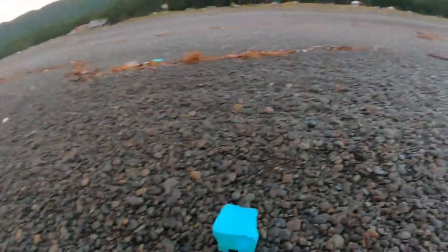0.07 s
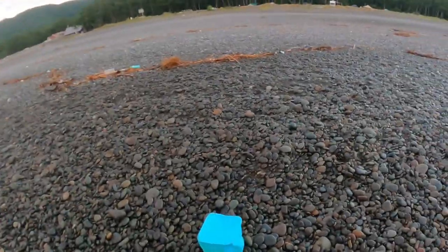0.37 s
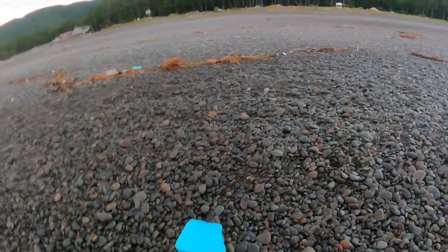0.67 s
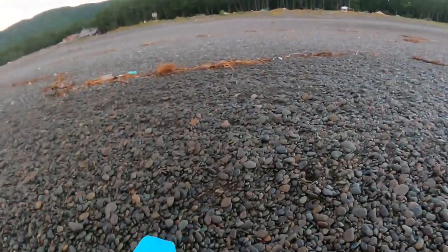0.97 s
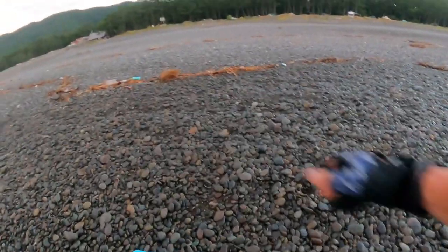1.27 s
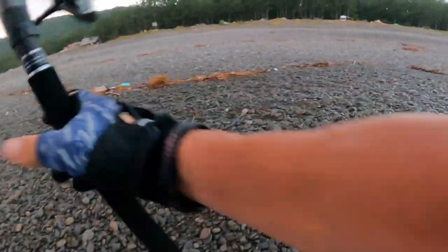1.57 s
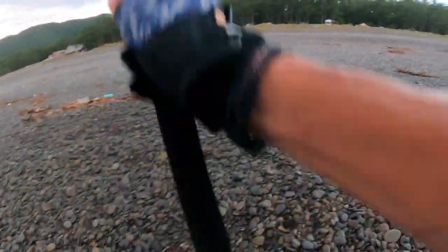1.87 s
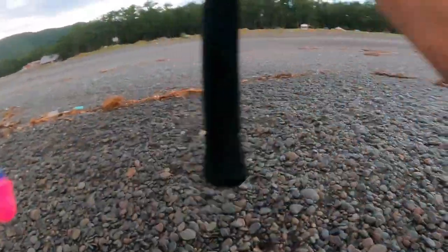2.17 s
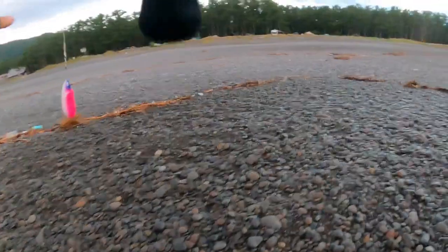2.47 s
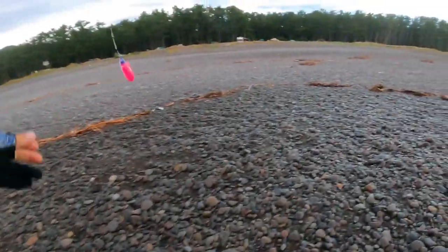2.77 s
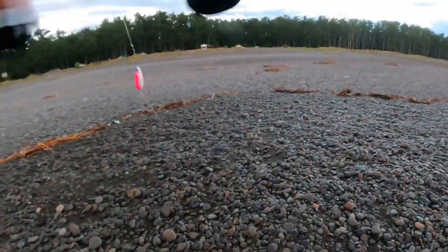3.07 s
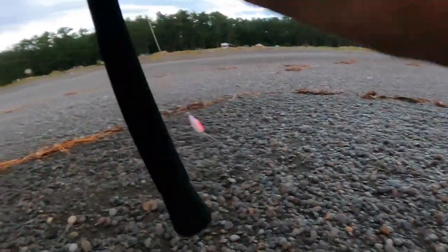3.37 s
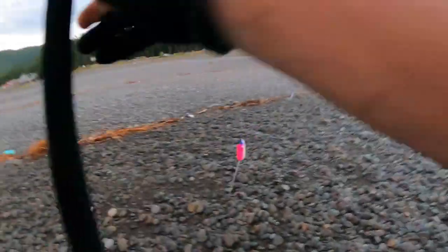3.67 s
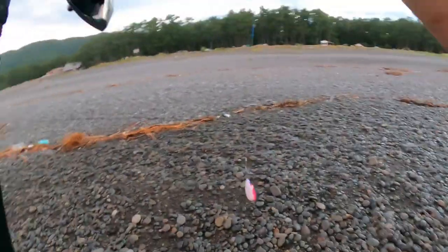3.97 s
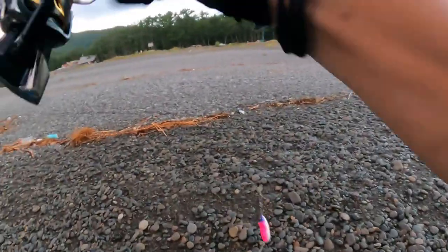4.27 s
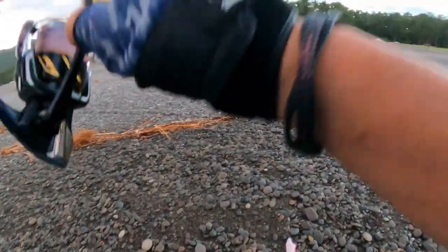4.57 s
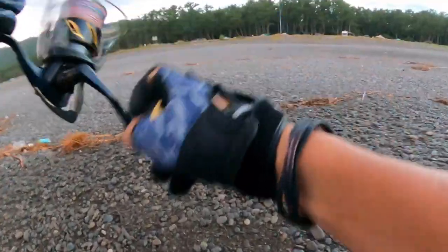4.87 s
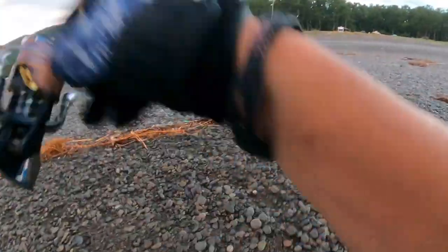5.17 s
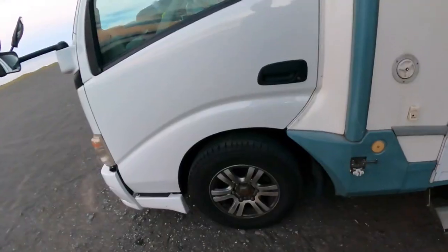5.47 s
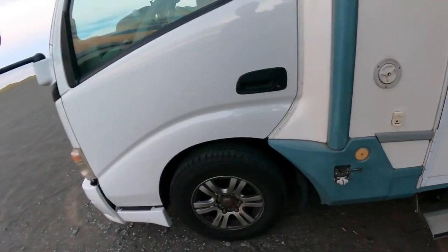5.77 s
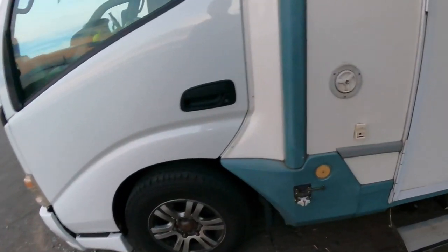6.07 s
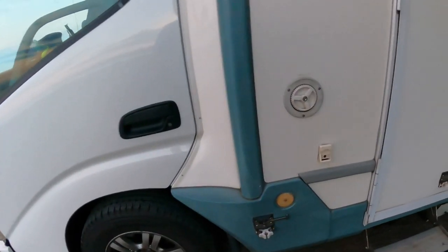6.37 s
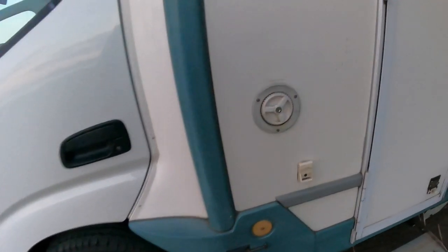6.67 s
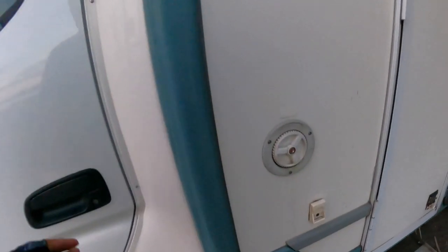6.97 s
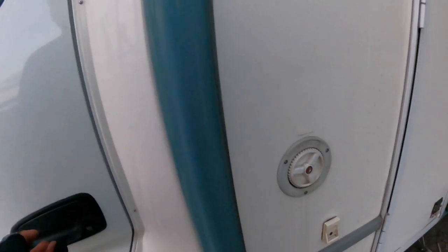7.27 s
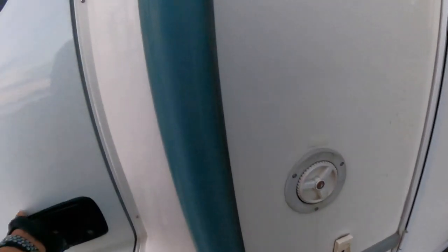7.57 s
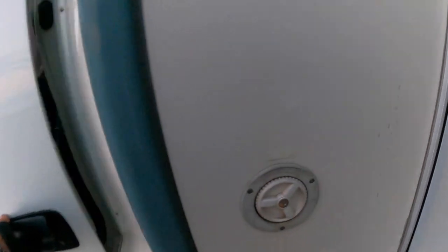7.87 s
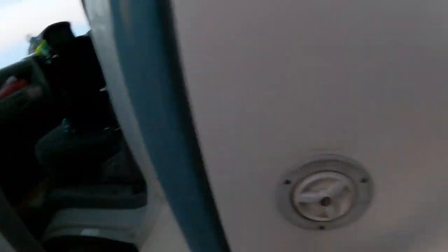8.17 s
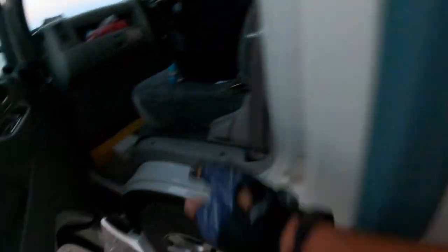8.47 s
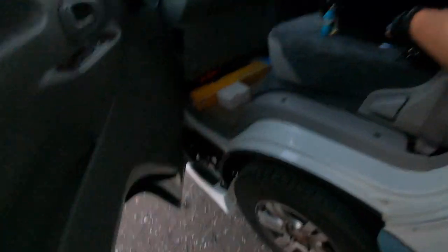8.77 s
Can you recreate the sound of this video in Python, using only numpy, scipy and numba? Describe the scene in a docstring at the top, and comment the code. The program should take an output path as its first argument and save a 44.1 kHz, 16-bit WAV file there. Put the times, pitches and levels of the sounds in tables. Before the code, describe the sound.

From the start, close footsteps crunch unevenly over beach pebbles, the stones clacking, clinking and grinding. A soft wash of surf fades after about 1 second, while low wind rumbles on the body-worn microphones throughout. Stronger steps land near 0.8, 2.3, 3.1 and 4.3 seconds; soles skid around 3.7, 4.4 and 5.1, the last with a grating stone. At about 5.4 seconds the sound cuts abruptly to a quieter gravel lot with light shoe scuffs and ticks. A faint, high insect buzz swells near 7 seconds and stops by 7.5. A distant bird gives short, faint chirps from 7 to 8.7. At 7.4 a hand scrapes and clicks into a van's door handle, and at 7.8 the latch releases with a hollow, briefly ringing thump, slightly left. Small clicks and scuffs follow, with a softer door knock near 8.9 seconds.

```python
"""Pebble beach and van door

Someone walks up a pebble beach: stones clack by impact and grind by friction under each step, while surf
fades behind and wind rumbles on body-worn microphones. Abruptly, a quieter gravel lot follows: an insect
sings, a far bird chirps, shoes scuff, a hand scrapes into a van's door handle, and the latch lets go,
setting the hollow door ringing with a thump."""
import sys
import numpy as np
from scipy import signal
from scipy.fft import rfft, irfft, next_fast_len
from scipy.io import wavfile
from scipy.ndimage import uniform_filter1d
from numba import njit

SR = 44100
rng = np.random.default_rng(int(sys.argv[2]) if len(sys.argv) > 2 else 0)


def put_to_file(sound):
    """Save the sound as 16-bit audio at rate SR, in the file named by the first command-line argument."""
    columns = np.atleast_2d(sound).T  # one column per channel
    safe = np.clip(columns, -1, 1)
    whole_steps = np.round(safe * 32767)
    wavfile.write(sys.argv[1], SR, whole_steps.astype(np.int16))


N = 394254
TIME = np.arange(N) / SR
CUT_S = 5.36  # the beach gives way to the gravel lot


def undb(db):
    """Amplitude ratio of a level in decibels."""
    return 10 ** (np.asarray(db) / 20)


def unit(x):
    """Normalisation to an rms of 1."""
    return x / np.sqrt(np.mean(x ** 2) + 1e-18)


def colour(x, points):
    """Minimum-phase filter through (Hz, dB) points: folding the cepstrum makes it causal."""
    size = next_fast_len(N + 8192, real=True)
    size += size % 2
    hz, db = np.transpose(points)
    freqs = np.arange(size // 2 + 1) * SR / size
    cepstrum = irfft(np.log(undb(np.interp(np.log(freqs + 1), np.log(hz), db))))
    cepstrum[1:size // 2] *= 2
    cepstrum[size // 2 + 1:] = 0
    return irfft(rfft(x, size) * np.exp(rfft(cepstrum)))[..., :N]


def rolloff(x, hz, kind):
    """Third-order low-pass or high-pass, 18 dB an octave."""
    return signal.sosfilt(signal.butter(3, hz, kind, fs=SR, output="sos"), x)


def resonate(x, hz, width_hz):
    """Forced response of one damped resonator."""
    return signal.lfilter(*signal.iirpeak(hz, hz / width_hz, fs=SR), x)


def wander(rate_hz):
    """Random modulation of rms 1, interpolated between knots."""
    knots = rng.standard_normal(2048)
    return unit(np.interp(TIME * rate_hz, np.arange(len(knots)), knots))


def noise(spectrum):
    """Spectrally shaped noise, independent in mid and side."""
    return unit(colour(rng.standard_normal((2, N)), spectrum))


def curve(points):
    """Gain over time, interpolated between (s, dB) points."""
    return undb(np.interp(TIME, *np.transpose(points)))


def envelope(start, attack, hold, fade):
    """Linear rise, hold, then exponential decay of 20 dB per fade time; a negative fade sustains."""
    age = TIME - start
    return np.clip(age / attack, 0, 1) * np.exp(-np.log(10) * np.clip((age - attack - hold) / fade, 0, 10))


def hiss():
    """Self-noise of the microphones: thin, steady and broadband."""
    # Each row: frequency in Hz, gain in dB.
    spectrum = [(500, 8.5), (2000, 1), (4000, -5), (6000, -5), (7600, 4.5), (8500, -4.5), (9600, -15),
                (11000, -29), (13000, -38), (15500, -59)]
    return noise(spectrum) * undb(-54)


def surf():
    """Broadband wash of waves, fading as the walker turns away and fainter at the van."""
    # Each row: frequency in Hz, gain in dB.
    spectrum = [(80, -5), (200, 4), (400, 3.5), (700, -0.5), (1100, -5.5), (1700, -12), (3000, -22),
                (6000, -28), (10000, -44), (13500, -51), (15500, -64)]
    # Each row: time in seconds, relative level in dB.
    levels = [(0, -37.5), (1.1, -37), (2.7, -43), (4, -47.5), (4.2, -44.5), (4.6, -47), (5.35, -44),
              (5.38, -48.5), (5.85, -51.5), (6.25, -49), (7.8, -55), (8.94, -54)]
    return noise(spectrum) * curve(levels) * undb(4 + wander(13))


def wind():
    """Turbulent pressure on the microphones: deep gusts and higher buffeting flutter together."""
    # Each row: frequency in Hz, gain in dB.
    gust_spectrum = [(12, -17), (25, -5), (40, 1.5), (55, -1.5), (70, 3), (95, -3.5), (140, -17),
                     (400, -84), (3000, -120)]
    buffet_spectrum = [(50, -13), (90, -0.5), (125, 2), (170, -2.5), (240, -10.5), (400, -22.5),
                       (1000, -62.5), (6000, -110)]
    # Each row: time in seconds, relative level in dB.
    gust_levels = [(0, -41), (2, -38), (4.3, -39), (5.3, -33.5), (6.5, -34.5), (8, -41), (8.94, -38)]
    buffet_levels = [(0, -32.5), (1, -35.5), (1.7, -41.5), (3.3, -43.5), (4.02, -41.5), (4.3, -33),
                     (5.3, -32.5), (5.7, -37), (7.7, -36.5), (8.1, -39.5), (8.94, -39)]
    flutter = undb(.91 * wander(12))
    gusts = noise(gust_spectrum) * curve(gust_levels) * undb(2)
    buffeting = noise(buffet_spectrum) * curve(buffet_levels) * undb(3)
    return (gusts + buffeting) * flutter


def insect(note_hz=5626, roughness_hz=110, rasp_hz=7200, rasp_width_hz=3000):
    """Modulation by slow noise widens an insect's note into a rough band; a thin rasp lies above it."""
    # The song swells, then stops. Each row: time in seconds, relative level in dB.
    levels = [(5.36, -68), (6.7, -63), (6.95, -59.5), (7.35, -61), (7.5, -80)]
    roughness = unit(rolloff(rng.standard_normal((2, N)), roughness_hz, "low"))
    note = roughness * np.sqrt(2) * np.sin(2 * np.pi * note_hz * TIME)
    rasp = rng.standard_normal((2, N))
    for _ in range(2):
        rasp = rolloff(resonate(rasp, rasp_hz, rasp_width_hz), 8500, "low")
    return (note + unit(rasp) * undb(-1)) * curve(levels) * (TIME > CUT_S)


def bird():
    """A far bird's chirps: short glides of a tone, modulated in frequency and amplitude, in mid only."""
    # Each row: start and length in seconds, first and last pitch in Hz, level in dB.
    chirps = [(7.056, .065, 4500, 4200, -53), (7.233, .06, 5500, 4700, -59), (7.45, .095, 5300, 4700, -58),
              (8.0, .06, 4950, 4500, -59), (8.07, .043, 4400, 4100, -56), (8.31, 0.1, 4550, 4150, -60),
              (8.68, .06, 4300, 4850, -58)]
    waver, flicker = 1 + .022 * wander(260), undb(4 * wander(110))
    song = np.zeros((2, N))
    for start, length, first_hz, last_hz, db in chirps:
        progress = np.clip((TIME - start) / length, 0, 1)
        hz = (first_hz + (last_hz - first_hz) * progress) * waver
        song[0] += undb(db) * flicker * np.sin(np.pi * progress) * np.sin(2 * np.pi * np.cumsum(hz) / SR)
    return song


@njit
def ring(starts, hz, t60, mid, side):
    """Free vibration: each contact sets off damped modes, summed in mid and side."""
    out = np.zeros((2, N))
    for k in range(len(starts)):
        first = int(starts[k] * SR)
        for m in range(hz.shape[1]):
            pole = np.exp(2j * np.pi * hz[k, m] / SR - np.log(1000) / (t60[k, m] * SR))
            phasor = 1 + 0j
            for i in range(first, min(N, first + int(t60[k, m] * SR))):
                out[0, i] += mid[k, m] * phasor.real
                out[1, i] += side[k, m] * phasor.imag
                phasor *= pole
    return out


def contacts(starts, sizes, ring_s, modes=6):
    """Modal impacts: each row of touches excites one set of random modes; low ones tend to ring longer."""
    shape = (len(starts), modes)
    hz = 14000 * ((np.arange(modes) + rng.random(shape)) / modes) ** 2 + 150
    t60 = ring_s * np.exp(.8 * rng.standard_normal(shape).clip(-2, 2)) * (4000 / hz) ** .35
    weight = hz ** .25 / np.sqrt(t60)
    mid, side = weight * rng.choice([-1, 1], shape), weight * rng.standard_normal(shape)
    return sum(ring(touch.copy(), hz, t60, mid * size[:, None], side * size[:, None])
               for touch, size in zip(starts.T, sizes.T))


def pressure(pushes, rest_db, lag_s, fade_ratio):
    """Incoherent pushes add in power, giving a bright load and a dull one that rises more slowly."""
    bright = dull = undb(rest_db) ** 2
    for start, attack, hold, fade, bright_db, dull_db in pushes:
        bright = bright + (undb(bright_db) * envelope(start, attack, hold, fade)) ** 2
        dull = dull + (undb(dull_db) * envelope(start, attack + lag_s, hold, fade * fade_ratio)) ** 2
    return np.sqrt(bright), np.sqrt(dull)


def crunch(loads, span_s, spectrum, ring_s, spread_db, clump_db, bright_db, dull_db, count, split_hz=2620):
    """Granular noise: many small contacts and a few large; the greater the load, the more stones knock."""
    bright, dull = loads
    begin, end = span_s
    when, strength, looseness, rebound = rng.random((count, 4)).T
    starts = begin + (end - begin) * when
    moving = np.interp(starts, TIME, np.clip((bright + dull) / undb(-22), .1, 1) ** .7)
    # a packed bed grinds more evenly; loose stones knock hard, the rest only rub
    packed = np.interp(starts, TIME, np.clip(dull / undb(-30), 0, 1))
    knock_db = -spread_db * (1 - .4 * packed) * np.log(np.maximum(strength, .012))
    sizes = np.where(looseness < moving, undb(knock_db), .45)
    # each stone rebounds once, at half strength
    touches = np.transpose([starts, starts + .004 * rebound])
    grains = colour(contacts(touches, np.outer(sizes, [1, .5]), ring_s), spectrum)
    grains *= undb(clump_db * wander(110))  # little avalanches
    out = 0
    for kind, load in (("high", bright * undb(bright_db)), ("low", dull * undb(dull_db))):
        band = rolloff(grains, split_hz, kind)
        # stones that move at one time share the energy of the push
        power = uniform_filter1d(band[0] ** 2, SR // 25) + np.mean(band[0] ** 2) / 1000
        out = out + band * load / np.sqrt(power)
    return out * (TIME < end)


def knocks(rows, spectrum, ring_s, chatter_s, fall_db, split_hz, bright_db, dull_db, clink_db, clink_s):
    """Rebound: a hard knock chatters six times within milliseconds, ever weaker; one pitch rings on."""
    starts, bright, dull, hz = np.transpose(sorted(rows))
    touch = np.arange(6)
    delays = chatter_s * (touch + rng.random((len(starts), len(touch))) - .5).clip(0)
    sizes = np.tile(undb(-fall_db * touch), (len(starts), 1))
    clicks = colour(contacts(starts[:, None] + delays, sizes, ring_s, modes=12), spectrum)
    clink_gain = undb(np.maximum(bright, dull) + clink_db)[:, None]
    clink_t60 = clink_s * np.sqrt(3000 / hz[:, None])
    clinks = ring(starts.copy(), hz[:, None].copy(), clink_t60, clink_gain, clink_gain / 2)
    out = rolloff(clinks, 8100, "low")
    # each knock is scaled to its own strength, band by band
    latest_knock = (np.searchsorted(starts, TIME + 1 / SR) - 1).clip(0)
    for kind, level_db in (("high", bright + bright_db), ("low", dull + dull_db)):
        band = rolloff(clicks, split_hz, kind)
        strength = np.sqrt(np.bincount(latest_knock, band[0] ** 2, len(starts)) / (SR / 200) + 1e-12)
        out = out + band * (undb(level_db) / strength)[latest_knock]
    return out


def scuffs():
    """Friction and small impacts by the van: shoes rasp on grit, a glove on the door, fittings tick."""
    # Each row: frequency in Hz, gain in dB.
    spectrum = [(120, 1), (350, 6), (700, 1.5), (1200, 3.5), (1800, -2), (2800, -7), (4000, -7.5),
                (5500, -12.5), (7000, -14), (8500, -26.5), (11000, -40.5), (15500, -53)]
    # Each row: start, attack, hold and fade in seconds, bright and dull relative levels in dB.
    rubs = [(5.99, .025, .035, .07, -44.5, -49), (6.12, .04, .2, .4, -54, -50),
            (6.73, 0.036, 0.062, 0.2, -50, -45), (6.9, 0.021, 0.041, .4, -52, -45.5),
            (7.37, .012, .025, 0.04, -23, -28), (7.41, 0.012, .012, .038, -30, -23),
            (7.612, .005, .075, 0.4, -49, -44), (7.69, .06, .015, .05, -36, -32),
            (7.794, 0.0053, .012, .055, -32, -23.5), (8.232, .006, .015, .06, -49, -44),
            (8.27, .02, .03, .08, -54, -54), (8.57, 0.009, .03, .1, -47.5, -46),
            (8.63, 0.029, .005, .025, -44, -36), (8.72, .03, 0.14, 1, -58, -48),
            (8.888, .014, .01, .06, -35, -44), (8.926, .008, .01, .05, -39, -48)]
    # Each row: start in seconds, bright and dull relative levels in dB, ringing pitch in Hz.
    ticks = [(5.536, -54, -27.5, 1060), (5.592, -46, -36.5, 1760), (5.659, -35, -50, 3600),
             (5.793, -33, -39, 1670), (6.318, -36, -44, 1200), (6.377, -33.5, -40, 1580),
             (6.509, -45, -35.5, 1430), (6.83, -48, -33, 1310), (6.935, -47, -35, 1400),
             (6.96, -46, -33, 980), (7.387, -26, -27, 3620), (7.425, -21.5, -24, 1150),
             (7.548, -42, -32, 1630), (7.617, -38.5, -33.5, 1270), (7.674, -42, -25, 1240),
             (7.754, -30, -39, 2470), (7.799, -39, -18.5, 1220), (7.835, -21, -18.5, 1000),
             (8.196, -35.5, -50, 3750), (8.235, -34.5, -47, 1680), (8.638, -47, -33, 1070),
             (8.659, -37, -24.5, 1910), (8.9, -40, -27, 1147)]
    loads = pressure(rubs, rest_db=-63, lag_s=.0028, fade_ratio=.94)
    rasping = crunch(loads, (CUT_S, N / SR), spectrum, ring_s=.0051, spread_db=3, clump_db=.5,
                     bright_db=-2, dull_db=1, count=10000)
    return rasping + knocks(ticks, spectrum, ring_s=.007, chatter_s=.0016, fall_db=2.5, split_hz=2200,
                            bright_db=-2.5, dull_db=-6, clink_db=-1, clink_s=.024)


def door(rattle_db=-12, rattle_t60=.2, side_db=3):
    """Impulse response of a hollow door to latch and handle: a long contact excites only low modes."""
    # Each row: frequency in Hz, relative level in dB, time to decay 60 dB in seconds.
    modes = [(46.3, -7.5, 0.15), (89, -19, .14), (166, -6.5, 0.14), (189, -4, 0.15), (247, -7.5, 0.087),
             (299, -13, 0.16), (328, -8.5, 0.19), (411, -10, 0.14), (461, -2.5, 0.066), (515, -9.5, 0.099),
             (587, -19, 0.18), (666, -12.5, 0.089), (785, -24, .15), (960, -25, .25), (1030, -18, .11),
             (1200, -28, .11), (1464, -25, .1)]
    # Each row: start in seconds, relative level in dB, contact time in milliseconds.
    blows = [(7.39, -21.5, 0.72), (7.424, -18, 0.69), (7.796, -7.5, 4.3), (7.808, -6, 2.8),
             (7.838, -9.5, 1.07), (8.660, -36, 0.54), (8.902, -20, 3)]
    age = TIME[:SR // 2]
    panel = sum(undb(db) * np.sin(2 * np.pi * hz * age) * undb(-60 * age / t60) for hz, db, t60 in modes)
    # trim and linkage inside add a dense, short rattle
    rattle = unit(rolloff(rng.standard_normal((2, len(age))), 860, "low"))
    rattle *= undb(rattle_db - 60 * age / rattle_t60)
    force = np.zeros(N)
    for start, db, contact_ms in blows:
        pulse = np.sin(np.pi * np.clip((TIME - start) * 1000 / contact_ms, 0, 1))
        force += undb(db) * pulse / pulse.sum()
    response = rattle + panel * np.array([[1], [undb(side_db)]])
    return signal.fftconvolve(response, force[None], axes=1)[:, :N]


def grating_stone():
    """Frictional excitation: jerky rubbing under the heel keeps the modes of one flat stone ringing."""
    # Each row: frequency and bandwidth in Hz, gain in dB.
    modes = [(1720, 90, -2), (2616, 60, 0), (2982, 50, 0), (3266, 70, -1), (3800, 250, -2)]
    rub = rng.standard_normal((2, N)) * undb(3 * wander(180))
    stone = sum(undb(db) * resonate(rub, hz, width) for hz, width, db in modes)
    return unit(stone) * undb(-32) * envelope(5.012, attack=.025, hold=.065, fade=.16) * (TIME < CUT_S)


def skidding_sole(slip_hz=85, slip_s=.0042, steady_drag=.28):
    """Stick-slip friction: each slip of the sole drags stones that sound in the hollows of the bed."""
    # Each row: resonance and bandwidth in Hz, gain in dB.
    hollows = [(740, 260, -2.5), (1040, 130, 1.5), (1360, 200, -3), (1690, 190, -3.5)]
    # Each row: start, attack, hold and fade in seconds, level in dB, frequency scale of the hollows.
    skids = [(3.63, .08, .04, 0.34, -33.5, 1.05), (4.378, .04, .03, 0.14, -30.5, 0.82),
             (5.058, .06, 0.1, 0.3, -27.5, 0.904)]
    phase = np.cumsum(slip_hz * np.exp(.34 * wander(60))) / SR % 1
    drag = rng.standard_normal((2, N)) * (steady_drag + np.exp(-phase / slip_hz / slip_s))
    out = 0
    for start, attack, hold, fade, db, scale in skids:
        bed = sum((-1) ** k * undb(gain_db) * resonate(drag, hz * scale, width * scale)
                  for k, (hz, width, gain_db) in enumerate(hollows))
        bed = unit(rolloff(bed, 2500 * scale, "low"))
        out = out + bed * undb(db) * envelope(start, attack, hold, fade)
    return out * (TIME < CUT_S)


def pebble_steps():
    """Granular flow underfoot: top stones clink brightly, the bed grinds dully, single stones clack."""
    # Each row: frequency in Hz, gain in dB.
    spectrum = [(150, -9), (400, 1), (800, 3), (1250, 4.5), (1800, 2.5), (2600, -0.5), (3400, -0.5),
                (5000, 1.5), (7000, -2.5), (8200, -11.5), (10000, -20), (13000, -32.5), (15500, -38)]
    # Each row: start, attack, hold and fade in seconds, bright and dull relative levels in dB.
    pushes = [(0, .002, 0.023, .09, -35, -35), (.08, .02, .22, .15, -52, -42),
              (.343, .004, .008, .03, -36, -35), (.445, .04, .015, .04, -39, -43),
              (.562, .004, .015, 0.03, -41, -42), (.61, .015, .005, .03, -44, -45),
              (.795, .09, .025, .13, -23.5, -27.5), (.935, .025, .055, .25, -28.5, -31),
              (1.06, 0.031, .05, .13, -36, -36), (1.19, .01, .035, .03, -27, -26.5),
              (1.25, .02, .01, .12, -43, -46), (1.582, .018, .015, .085, -24.5, -29),
              (1.697, .01, .03, .12, -37.5, -39.5), (1.87, 0.043, 0.055, .05, -44, -42.5),
              (2.06, .02, .06, .05, -45, -46), (2.15, .015, .02, 0.087, -37, -36),
              (2.23, .01, .02, .04, -42, -47), (2.285, .005, .01, .12, -38, -39),
              (2.33, .012, 0.057, 0.17, -31.5, -32.5), (2.445, 0.016, 0.036, 0.17, -33, -38.5),
              (2.6, .05, 0.0084, .07, -38, -40), (2.85, .09, .005, 0.03, -39, -38),
              (2.985, 0.019, .012, .05, -34, -28.5), (3.094, .025, .03, 0.15, -22, -23.5),
              (3.15, .015, .01, 0.18, -24, -33), (3.325, .025, .04, .07, -38, -37),
              (3.46, .03, .12, 0.4, -46.5, -44), (3.63, 0.038, 0.036, 0.13, -35.5, -33),
              (3.7, 0.027, 0.0084, 0.13, -27.5, -26.5), (3.82, 0.044, .1, .15, -43.5, -40),
              (4.02, .02, .055, .04, -46, -43), (4.18, .02, .04, .04, -49, -47),
              (4.258, 0.01, 0.066, 0.23, -25, -34), (4.37, .05, 0.071, .1, -28.5, -29.5),
              (4.51, .025, .012, .055, -26, -24), (4.75, .08, .05, 0.5, -50.5, -48),
              (4.94, .02, 0.046, -0.5, -47, -40.5), (4.998, 0.015, 0.079, .2, -25.5, -26),
              (5.1, .04, .085, .07, -32, -30), (5.29, 0.018, .05, .05, -43, -39)]
    # Each row: start in seconds, bright and dull relative levels in dB, ringing pitch in Hz.
    clacks = [(.014, -21.5, -20, 1290), (.062, -30, -27.5, 1450), (.347, -27.5, -42, 1750),
              (.452, -30, -46, 5200), (.492, -22, -40, 4600), (.566, -33, -41, 1280),
              (.702, -33, -34, 1500), (.795, -19, -17, 1265), (.84, -21, -22, 5670),
              (.882, -14, -18.5, 4660), (1.174, -24.5, -24.5, 1430), (1.198, -19.5, -23, 1230),
              (1.228, -18, -27, 5300), (1.394, -34, -47, 1100), (1.596, -30, -24, 4600),
              (1.708, -25.5, -31.5, 5330), (2.161, -29.5, -27.5, 1240), (2.179, -24, -39, 4760),
              (2.287, -23, -20, 1350), (2.289, -15, -21.5, 2900), (2.336, -26, -27, 5380),
              (2.396, -22.5, -31, 1780), (2.938, -33, -25, 2700), (2.99, -25.5, -22, 1700),
              (3.008, -22, -21.5, 1120), (3.103, -17, -30, 4510), (3.112, -16, -20, 4780),
              (3.142, -16, -18, 5570), (3.225, -21.5, -40, 5100), (3.295, -26, -36, 4970),
              (3.35, -20, -24.5, 4700), (3.41, -28, -39, 1080), (3.968, -42, -32, 2750),
              (4.025, -30.5, -34.5, 1800), (4.261, -16, -23.5, 5130), (4.272, -10.5, -33, 5120),
              (4.308, -11.5, -35, 5250), (4.334, -14, -24.5, 6100), (4.371, -18.5, -20, 5700),
              (4.535, -30, -18.5, 1990), (4.539, -22, -21, 3770), (4.764, -42, -35, 2200)]
    loads = pressure(pushes, rest_db=-57, lag_s=.0026, fade_ratio=1.03)
    grinding = crunch(loads, (0, CUT_S), spectrum, ring_s=.008, spread_db=4.2, clump_db=-.5,
                      bright_db=-1, dull_db=-1.5, count=12000)
    return grinding + knocks(clacks, spectrum, ring_s=.0094, chatter_s=.00097, fall_db=1.5, split_hz=4600,
                             bright_db=-7, dull_db=-6.5, clink_db=1, clink_s=.018)


def scene(feet_side_db=-5, door_left=.1, left_lag_s=9e-6):
    """Superposition of all sources in mid and side, whose sum and difference are left and right."""
    # Stereo width. Each row: frequency in Hz, gain of the side signal in dB.
    width = [(60, -35), (125, -33), (250, -16.5), (500, -9), (1000, -5.5), (2200, -3), (4500, -6.5),
             (8000, -9.5), (12000, 0.5)]
    steps, lot = pebble_steps(), scuffs()
    feet = steps + skidding_sole() + grating_stone()
    feet[1] *= undb(feet_side_db)  # straight below the microphones, the feet sound narrower
    thumps = door()
    mid, side = feet + lot + thumps + insect() + bird() + surf() + wind() + hiss()
    # the left microphone is a little louder, and the door stands to the left
    side = colour(side, width) + .035 * mid + door_left * thumps[0]
    # the slope of the mid signal stands in for a tiny delay of the left channel
    side -= left_lag_s * SR / 2 * np.gradient(mid)
    return np.array([mid + side, mid - side])


def record(dry, bottom_hz=15, top_hz=15700):
    """Band limiting and soft saturation: the deepest rumble and the top are cut, loud peaks rounded."""
    rounded = np.tanh(rolloff(dry, bottom_hz, "high"))
    return signal.sosfilt(signal.ellip(8, .2, 70, top_hz, fs=SR, output="sos"), rounded)


dry = scene()
out = record(dry)
put_to_file(out)
```